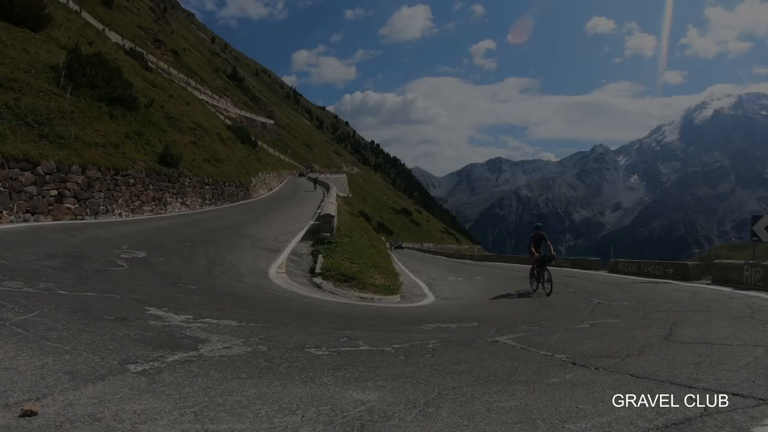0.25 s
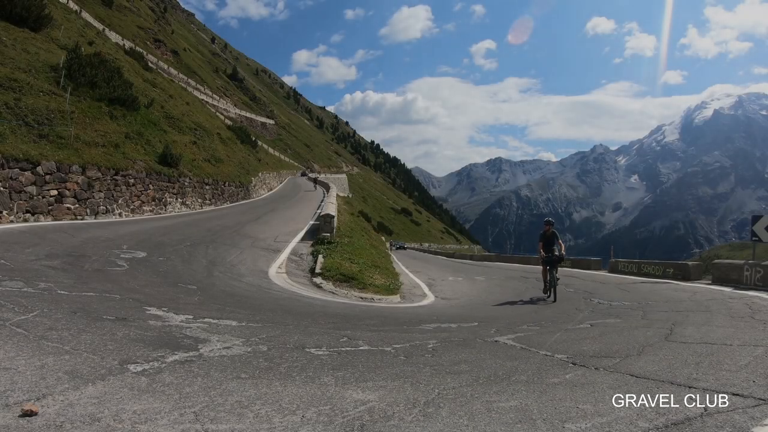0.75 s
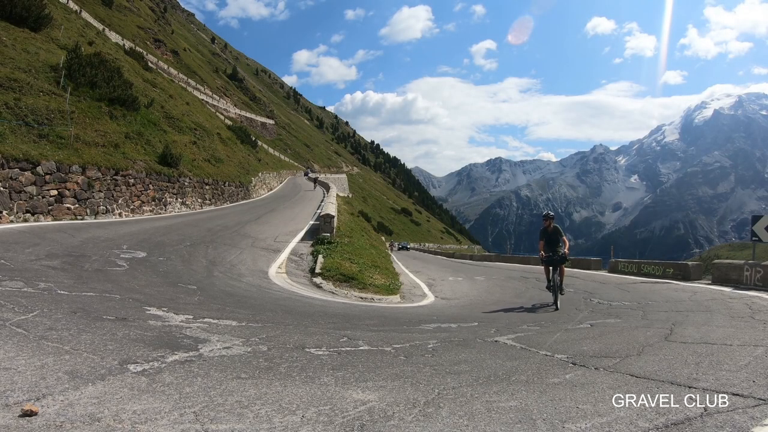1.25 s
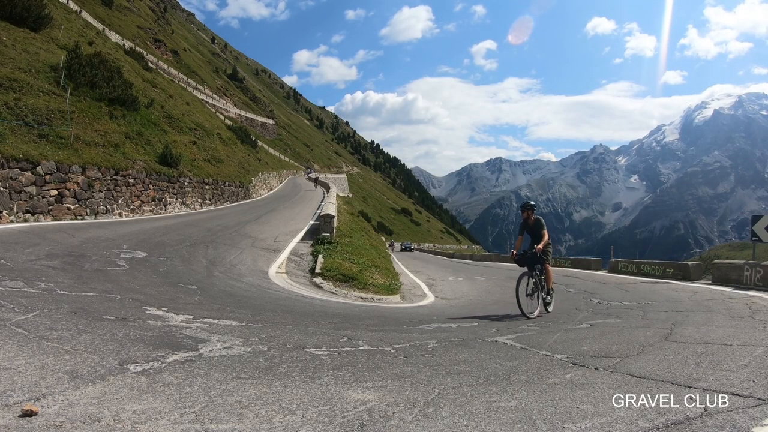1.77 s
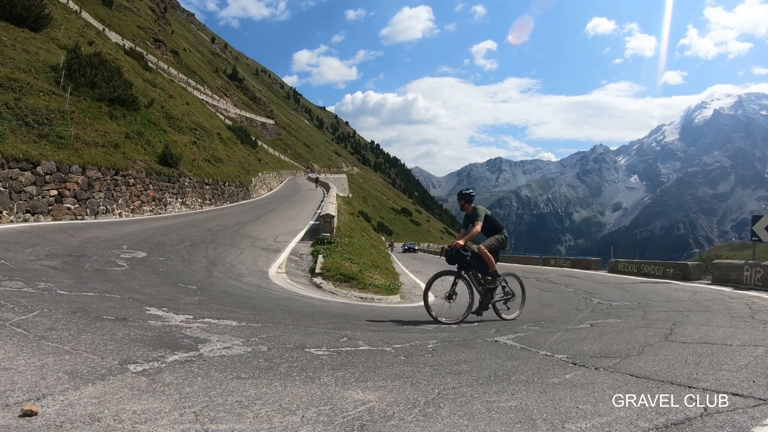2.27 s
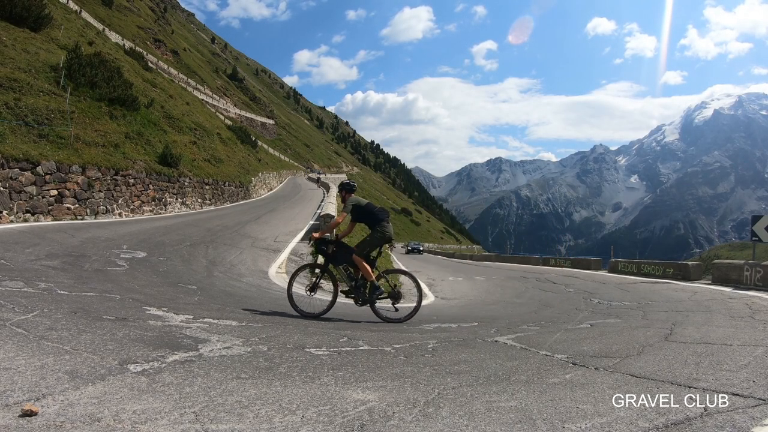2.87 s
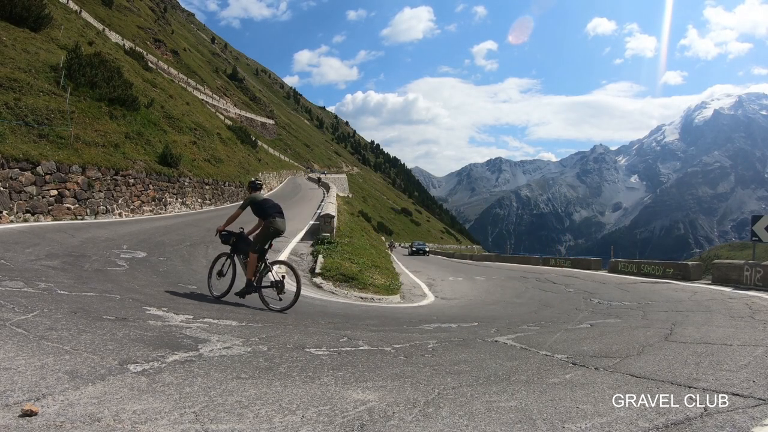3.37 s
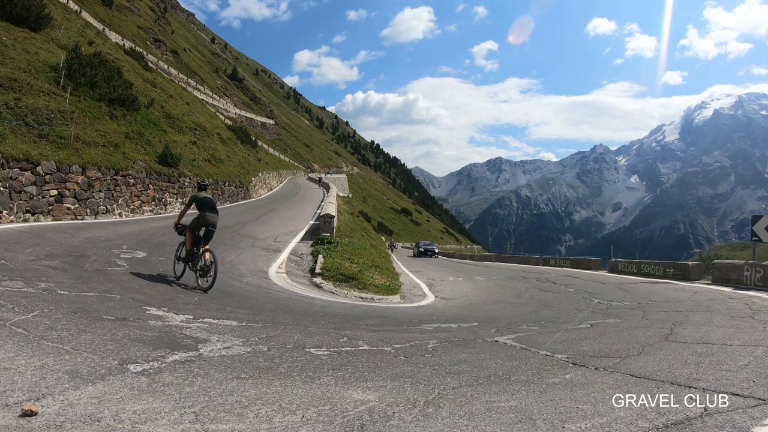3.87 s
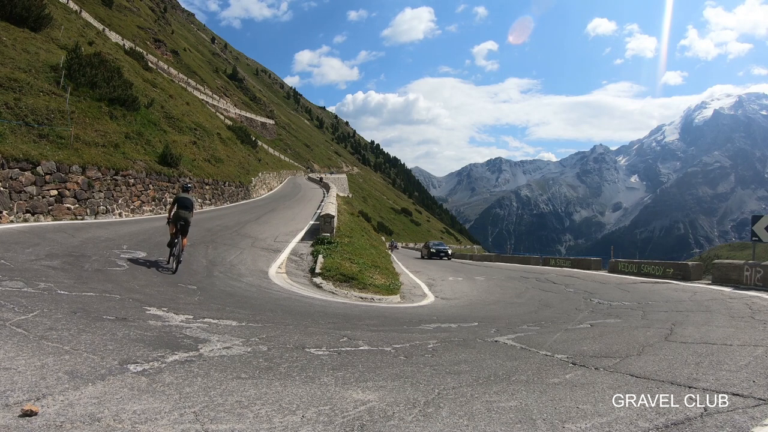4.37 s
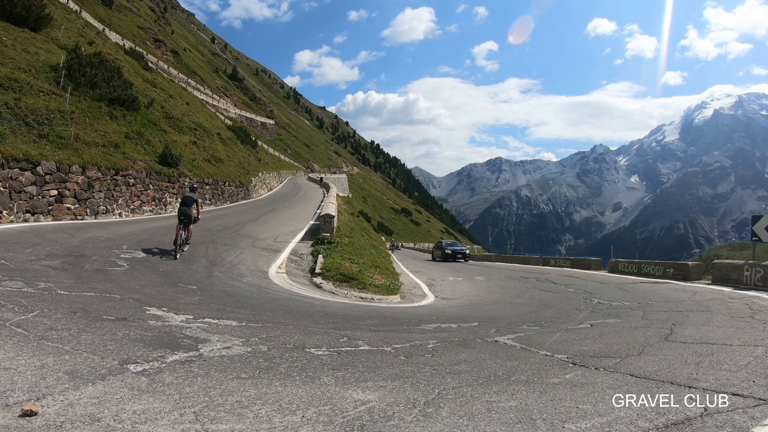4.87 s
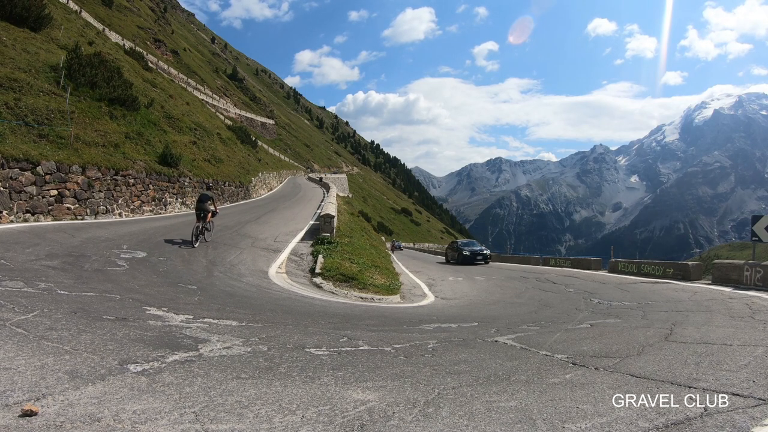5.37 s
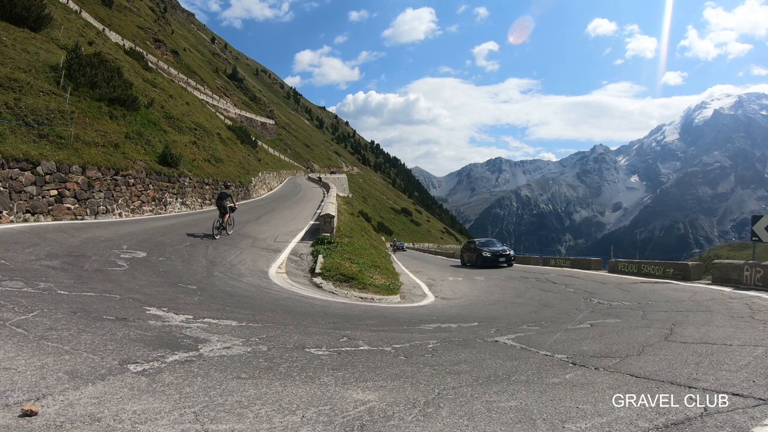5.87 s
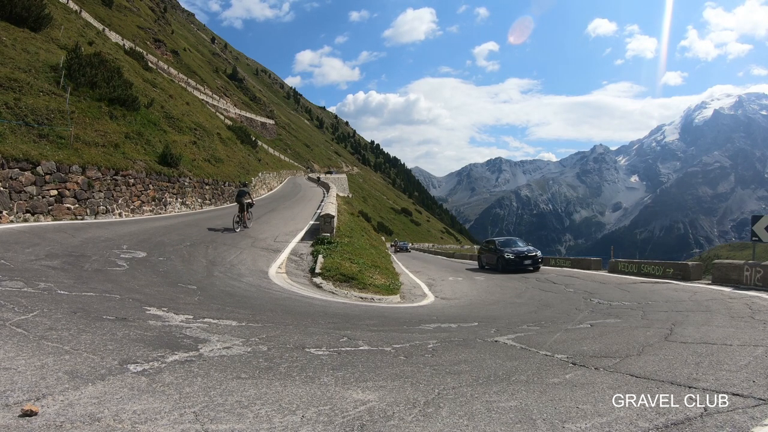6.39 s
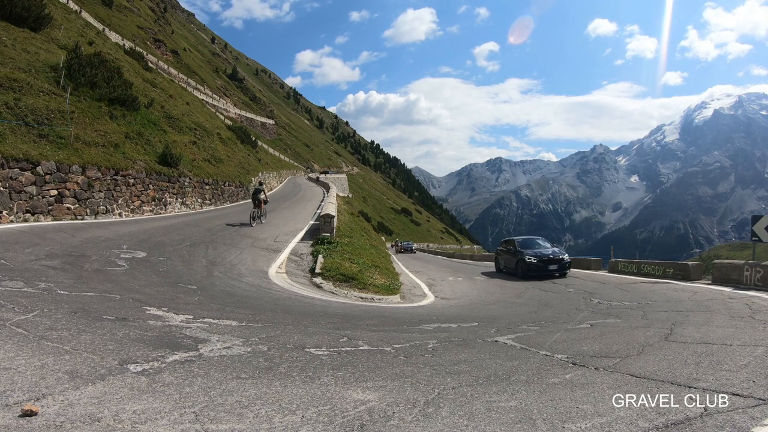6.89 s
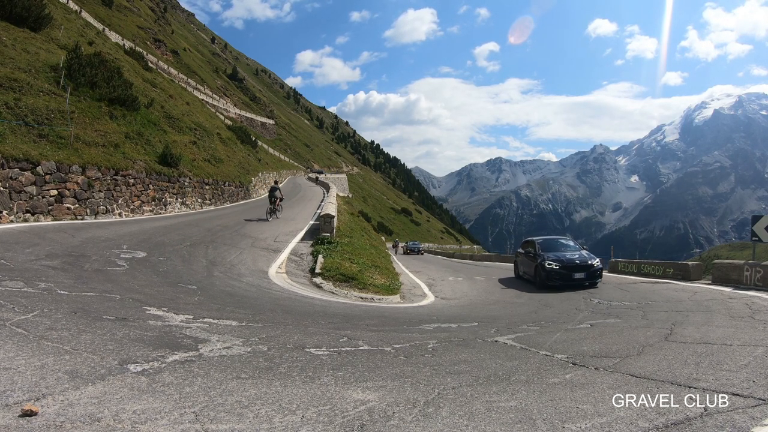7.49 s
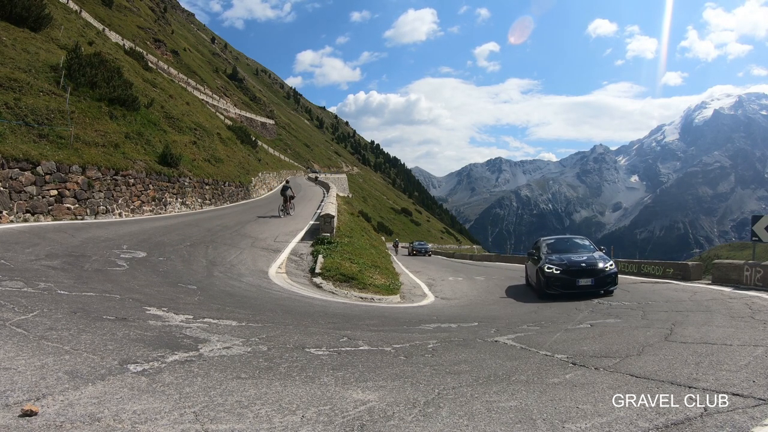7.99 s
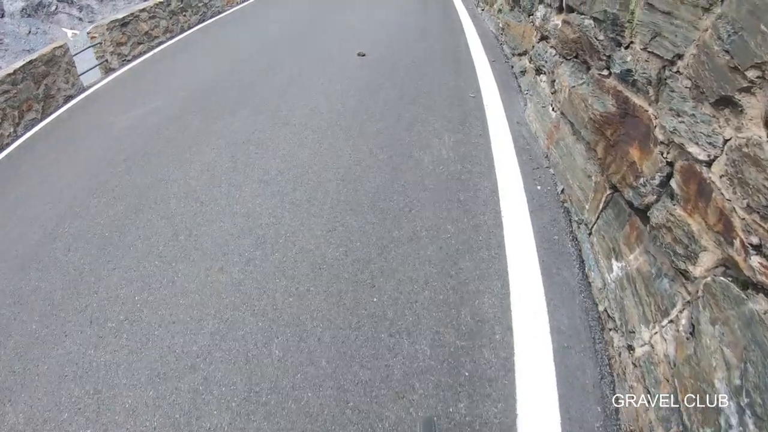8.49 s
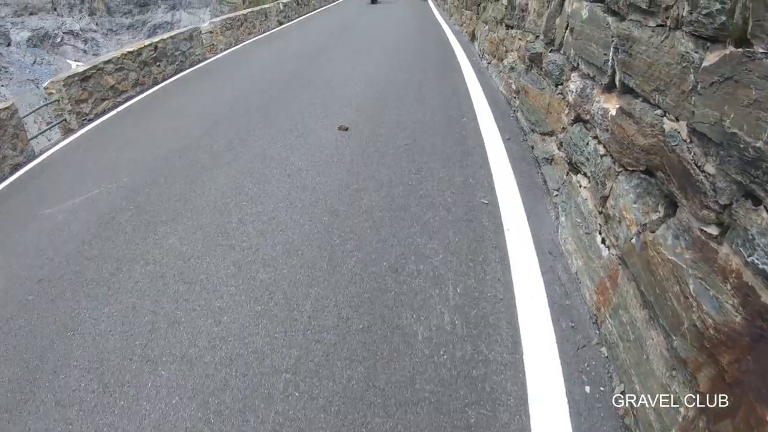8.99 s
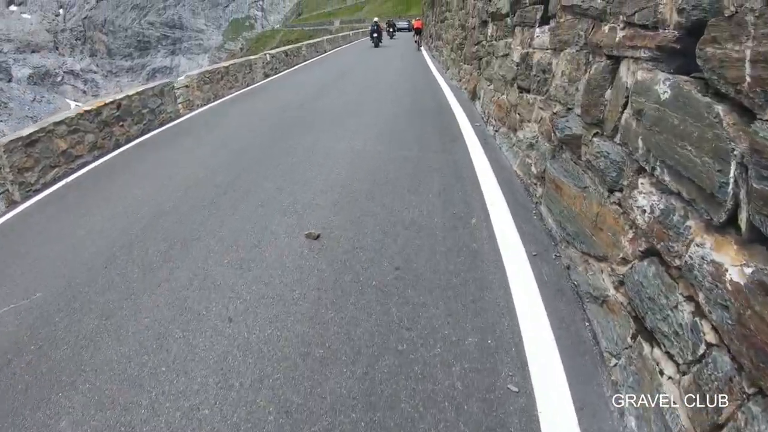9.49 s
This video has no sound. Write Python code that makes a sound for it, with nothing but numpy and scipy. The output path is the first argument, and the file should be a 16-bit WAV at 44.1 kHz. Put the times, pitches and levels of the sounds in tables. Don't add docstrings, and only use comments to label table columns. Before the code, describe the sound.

Low engines drone and drift along a mountain road over tyre roar, cut dead, then motorcycles roar close along a stone wall.

```python
import sys
import numpy as np
from scipy import signal
from scipy.fft import rfft, irfft, next_fast_len
from scipy.io import wavfile
from scipy.ndimage import uniform_filter1d

SR = 44100
rng = np.random.default_rng(int(sys.argv[2]) if len(sys.argv) > 2 else 0)


def generate_wav(sig):
    pcm = np.round(np.clip(np.atleast_2d(sig).T, -1, 1) * 32767).astype(np.int16)
    wavfile.write(sys.argv[1], SR, pcm)


def magnitude_from_level(level_db):
    exponent = np.asarray(level_db, float) / 20
    return 10 ** exponent


N = 429534


def rms_one(x):
    return x / np.sqrt(np.mean(x ** 2) + 1e-20)


def over_time(s, values):
    return np.interp(np.arange(N) / SR, s, values)


def in_time(rows):
    s, *columns = np.transpose(rows)
    return [over_time(s, column) for column in columns]


def drift(rate_hz):
    r = np.exp(-80 * np.pi * rate_hz / SR)
    slow = signal.lfilter([1], [1, -2 * r, r * r], rng.standard_normal(N // 40 + 2002))[2000:]
    return np.interp(np.arange(N) / 40, np.arange(len(slow)), rms_one(slow))


def resonate(x, hz, width_hz):
    r = np.exp(-np.pi * width_hz / SR)
    top_gain_one = np.array([1, 0, -1]) * (1 - r * r) / 2
    return signal.lfilter(top_gain_one, [1, -2 * r * np.cos(2 * np.pi * hz / SR), r * r], x)


def band_noise(order, band_hz):
    band = signal.butter(order, band_hz, "band", fs=SR, output="sos")
    return rms_one(signal.sosfilt(band, rng.standard_normal(N)))


def coloured(spectrum, patchy_db, gust_db):
    size = next_fast_len(N)
    octave = np.log2(np.arange(size // 2 + 1) * SR / size + 1)
    hz, level_db = np.transpose(spectrum)
    shape = magnitude_from_level(np.interp(octave, np.log2(hz), level_db, -120, -120))
    whole = rfft(rng.standard_normal(size)) * shape
    out, together_db = 0, gust_db * drift(5.3)
    for centre in range(int(np.log2(hz[0])), int(np.log2(hz[-1])) + 2):
        band = irfft(whole * np.clip(1 - abs(octave - centre), 0, 1), size)[:N]
        out = out + band * magnitude_from_level(patchy_db * drift(16) + together_db)
    return rms_one(out)


def above(level_db, far_db):
    return np.sqrt(np.clip(magnitude_from_level(level_db) ** 2 - magnitude_from_level(far_db) ** 2, 0, None))


def engine(rows, wobble, flutter_db, orders=((1, 0, 1),), fade_s=99):
    hz, load_db = in_time(rows)
    turn = 2 * np.pi * np.cumsum(hz * (1 + wobble * drift(3.86))) / SR
    out = 0
    for multiple, db, load_share in orders:
        level = magnitude_from_level(db + load_share * load_db + flutter_db * drift(2))
        out = out + level * np.sin(multiple * turn + rng.uniform(0, 2 * np.pi))
    first, last = rows[0][0], rows[-1][0]
    return np.sqrt(2) * out * over_time([first - fade_s, first, last, last + fade_s], [0, 1, 1, 0])


def far_rumble(lull_db):
    # (frequency [Hz], density [dB per Hz])
    rumble_band = [(12, -45), (20, -9), (60, -1.5), (91, 1), (136, -3.5), (184, -19), (258, -16),
                   (400, -31.5), (520, -48), (880, -120)]
    fading_db = -30.5 - 0.07 * np.arange(N) / SR
    return magnitude_from_level(fading_db + lull_db) * coloured(rumble_band, patchy_db=1, gust_db=.5)


def valley_roar(near_db):
    # (frequency [Hz], density [dB per Hz])
    valley_band = [(170, -3.5), (250, -2.5), (330, -10), (430, -11.5), (700, -20.5), (1200, -19.5),
                   (1800, -25), (3000, -30), (4500, -41), (5800, -52), (7500, -73), (10000, -74),
                   (12000, -87.5), (15000, -85)]
    roar_db = -38 + 0.58 * near_db + over_time((4.74, 6.1), [0, 3.5])
    wash_db = -50 + over_time([0, 0.67], [-2, 0])
    roar = coloured(valley_band[:5] + [(1400, -41.0)], patchy_db=0.27, gust_db=0.47)
    wash = coloured([(400, -28.5)] + valley_band[4:], patchy_db=0.04, gust_db=0.5)
    return magnitude_from_level(roar_db) * roar + magnitude_from_level(wash_db) * wash


def exhaust_drone():
    # (time [s], level [dB])
    drone_level = [(0, -59), (.3, -51.5), (.7, -50), (1.1, -53.5), (1.28, -56), (1.38, -51), (1.5, -59),
                   (2.2, -66), (2.6, -90)]
    # (frequency [Hz], density [dB per Hz])
    drone_band = [(420, -20.5), (480, 0.5), (600, -1.5), (680, -6.5), (730, -25)]
    return magnitude_from_level(in_time(drone_level)[0]) * coloured(drone_band, patchy_db=1.5, gust_db=1.0)


def tyres_rolling(near_db):
    # (frequency [Hz], density [dB per Hz])
    tyre_band = [(620, 0), (850, -4.5), (1300, 1.5), (1700, -2), (1950, -15), (2900, -11), (3500, -15),
                 (4000, -24.5), (4900, -24), (5800, -32.5), (7000, -36.5), (9000, -42.5), (11000, -49),
                 (14000, -66)]
    # (time [s], hiss level [dB])
    hiss_level = [(0, -55), (.3, -53), (.55, -52.5), (.8, -50), (1.1, -51.5), (1.42, -51.5), (1.6, -55.5),
                  (2.4, -56.5), (3.2, -58.5)]
    # (frequency [Hz], width [Hz], level over the hiss [dB])
    whistle_rows = [
        (2757, 110, -9),
        (3466, 79, -12.5),
        (4700, 60, -22),
        (5200, 60, -26),
    ]
    tread = coloured([(500, -22.5)] + tyre_band[1:5] + [(2600, -30.0)], patchy_db=1.0, gust_db=1.1)
    hiss = coloured([(1500, -28.0)] + tyre_band[4:], patchy_db=2.0, gust_db=1.0)
    white = rng.standard_normal(N)
    for hz, width_hz, db in whistle_rows:
        hiss += magnitude_from_level(db) * rms_one(resonate(resonate(white, hz, width_hz), hz, width_hz))
    return above(-46 + near_db, -53.5) * tread + above(in_time(hiss_level)[0], -58) * hiss


def distant_engines(lull_db):
    # (time [s], firing rate [Hz], load [dB])
    slowing, passing, arriving = [(0, 45.51, -43.5), (.45, 45.5, -42), (.75, 44.5, -27.5),
                                  (1.5, 43.5, -27.5), (1.72, 43, -33.5), (1.95, 42.5, -29),
                                  (2.1, 42.5, -34.5), (2.52, 41.5, -38), (2.7, 41.5, -23.5),
                                  (2.87, 41, -38), (3.15, 40.5, -29.5), (4.3, 40.5, -27), (4.9, 40, -35.5),
                                  (5.5, 40, -29), (6.2, 39.5, -40), (6.75, 38.5, -32), (7.02, 39, -46),
                                  (7.25, 39, -35), (8.24, 38, -37.5)], [(.7, 111.3, -4.5), (1.1, 113.5, -1.5),
                                                   (1.5, 116.2, -0.5), (1.9, 116.8, -1), (2.3, 116.4, -1.5),
                                                   (2.6, 114.9, -3.5), (3.6, 112.7, -3), (4.3, 107, -6)], [(4.95, 67.27, -5.5), (5.6, 70, -2),
                                                                    (6, 71.4, -1), (6.3, 70.96, -3.5),
                                                                    (6.6, 70.07, -2.5), (7.1, 68.1, -5),
                                                                    (8.1, 64, -2)]
    # (multiple of the firing rate, level [dB], share of the load swing)
    slowing_orders = [(1, -28.5, 0.26), (2, 0.0, 1.0)]
    passing_orders = [(1, -32, 1.0), (2, -36, 2.8), (3, -47.5, 1.2)]
    arriving_orders = [(1, -36.5, 1.2), (2, -43, 0.49)]
    # (time [s], firing rate [Hz], level [dB])
    descending, climbing, steady = [(.6, 110, -28.5), (1.0, 108.2, -32), (1.9, 106.2, -34.5),
                                    (2.25, 106.4, -31), (2.42, 105.6, -26.5), (2.85, 104.9, -27),
                                    (3.3, 102.6, -27), (3.8, 100.1, -32.5), (4.4, 98, -32.5),
                                    (4.9, 96.5, -28), (5.25, 95.5, -35), (5.7, 93.5, -39.5),
                                    (6.0, 91.75, -30.5), (6.45, 88, -35), (6.62, 87.4, -51),
                                    (7.02, 86.9, -46), (7.3, 84.7, -30), (8.24, 83.8, -33)], [(3.8, 115.7, -37.5), (4.25, 116.5, -39.5),
                                                        (4.6, 119.6, -34), (5.0, 120, -37.5),
                                                        (5.4, 121.2, -39), (6.25, 125.3, -38.5)], [(.4, 132, -47), (1.2, 136, -41.5),
                                                                          (2.3, 138.3, -39),
                                                                          (3, 136.8, -46),
                                                                          (3.6, 136.5, -41.5),
                                                                          (4.3, 135.7, -43.5),
                                                                          (4.9, 135.3, -35.5),
                                                                          (5.6, 133.6, -38.5),
                                                                          (6.5, 131.2, -44.5),
                                                                          (7.0, 129.4, -39),
                                                                          (7.3, 128.3, -36),
                                                                          (7.7, 128, -36.5),
                                                                          (8.2, 127.1, -38)]
    # (time [s], frequency [Hz], level [dB])
    overtones = [
        [(0, 581, -54), (.5, 601, -56)],
        [(.6, 254.5, -43), (1.05, 251.8, -43)],
        [(0, 159.6, -47), (.3, 164.5, -46.5), (1.1, 171.6, -46)],
        [(0, 211, -53.5), (.55, 221.4, -47.5)],
        [(3.3, 165, -48), (3.7, 164.5, -46.5), (4.2, 162.5, -42.5), (4.6, 160.6, -44)],
        [(3.0, 260.7, -48), (3.3, 259.4, -48.5)],
        [(3.7, 252.5, -44), (4.0, 254, -46.5)],
        [(6.9, 245, -47), (7.5, 239.8, -47), (8.1, 231.3, -43.5)],
        [(6.55, 156, -40.5), (6.75, 156.9, -42), (7.35, 154.3, -40.5), (8.3, 153.1, -41)],
    ]
    eased = engine(passing, .003, 1.6, passing_orders, fade_s=0.23)
    eased += engine(arriving, 0.0041, 2.5, arriving_orders, fade_s=0.82)
    eased += engine(climbing, 0.004, 2.0, fade_s=0.24)
    eased += engine(steady, 0.003, 1.5)
    out = magnitude_from_level(2.2 * lull_db) * eased
    out += engine(slowing, 0.002, 0.6, slowing_orders)
    out += engine(descending, 0.002, 0.6, fade_s=.06)
    return out + sum(engine(rows, 0.0063, 2.5, fade_s=0.13) for rows in overtones)


def grasshopper():
    first_s, period_s, length_s = 2.715, .17663, .045
    t = np.arange(N) / SR - first_s + period_s / 2
    swell = np.exp(-((t % period_s - period_s / 2) / length_s * 2) ** 2)
    pulse = swell * np.clip(t / 2, 0, 1) * magnitude_from_level(3.5 * drift(4)) + 1.0
    return magnitude_from_level(-86.5 + 1.4 * drift(12)) * pulse * band_noise(5, (5200, 9600))


def ticks():
    # (time [s], peak [dB], ring [Hz], width [Hz], rattle length [s])
    tick_rows = [(0.061, -56, 7000, 5000, 0.012), (0.1558, -39.5, 2100, 600, 0.002),
                 (0.215, -40, 1980, 350, .002), (0.216, -42, 1400, 500, .001),
                 (.669, -30.5, 4150, 3400, .005), (0.6699, -43, 8600, 6000, .008),
                 (.672, -33.5, 2900, 1500, .006), (.671, -32, 1500, 1300, .006),
                 (.677, -32.5, 1250, 800, .008), (.679, -36, 2300, 1400, .008),
                 (.848, -58, 7000, 4960, .003), (2.3924, -48, 2900, 900, .0005),
                 (2.3935, -49, 4600, 1300, .001), (2.3955, -56, 5300, 900, .001),
                 (2.394, -60, 7000, 1800, .001), (2.393, -70, 10600, 700, .0002),
                 (4.2345, -36, 1488, 550, 0.0004), (5.045, -68, 9900, 2000, .002),
                 (5.2585, -61, 7000, 2500, .004), (5.2635, -56, 5200, 1498, .002),
                 (5.279, -65, 6800, 900, .002), (6.2335, -65, 10300, 1997, .002),
                 (6.9381, -21.5, 830, 680, .0002), (6.9382, -40, 3050, 700, .0002),
                 (6.942, -38.5, 900, 900, .0005), (6.9482, -34, 896, 900, .0002),
                 (6.953, -36, 900, 900, .001), (0.663, -42, 750, 60, .004), (8.48, -35, 3000, 2500, .012),
                 (8.522, -27, 900, 300, .002), (8.547, -32, 900, 300, .002), (8.82, -28.5, 890, 450, .006)]
    out, t = np.zeros(N), np.arange(SR // 10) / SR
    for s, peak_db, hz, width_hz, length_s in tick_rows:
        sparse = rng.standard_normal(len(t)) * (rng.random(len(t)) < .05)
        ring = .5 * sparse * np.exp(-t / max(length_s, 1e-4))
        ring[0] = -1
        for _ in range(3):
            ring = resonate(ring, hz, width_hz)
        out[round(s * SR):][:len(t)] += magnitude_from_level(peak_db) * ring / abs(ring).max()
    return out


def high_puffs():
    # (time [s], peak [dB])
    puff_rows = [(0.8113, -84.5), (0.8672, -90), (0.948, -92), (1.1261, -84.5), (1.1874, -80),
                 (1.4409, -80.5), (1.756, -80.5), (2.2166, -85.5), (2.3907, -92), (2.8217, -90),
                 (2.937, -81), (3.1103, -81.5), (3.21, -78.5), (3.4967, -84), (3.6573, -80),
                 (3.7636, -82.5), (3.796, -82), (3.8647, -79.5), (3.92, -81), (4.1422, -79.5),
                 (4.3604, -78), (4.7074, -77.5), (4.9589, -77), (5.359, -85.5), (5.8878, -86),
                 (5.9396, -86.5), (6.0357, -78.5), (6.1342, -83), (6.2993, -80.5), (6.8087, -86),
                 (7.8997, -78)]
    t, level, puff_s = np.arange(N) / SR, magnitude_from_level(-108), .003
    for s, peak_db in puff_rows:
        level = level + magnitude_from_level(peak_db - 6) * np.exp(-((t - s - puff_s) / puff_s) ** 2)
    return level * band_noise(4, (9500, 15400))


def thinned(x):
    # (low edge [Hz], high edge [Hz], kept above this over the usual level [dB])
    top_bands = [(8800, 9300, -3.5), (9300, 9800, -2.5), (9800, 10400, 0), (10400, 11200, 2.5),
                 (11200, 12200, 16), (12200, 14000, 15)]
    hz, out = np.arange(N // 2 + 1) * SR / N, x.copy()
    for low_hz, high_hz, keep_db in top_bands:
        band = irfft(rfft(x) * ((hz > low_hz) & (hz <= high_hz)), N)
        level_db = 10 * np.log10(uniform_filter1d(band ** 2, size=4096) + 1e-20)
        over_db = level_db - np.median(level_db) + 2 * drift(5.0)
        kept = (over_db > keep_db)[::1024]
        out -= band * uniform_filter1d(1. - np.repeat(kept, 1024)[:N], size=512)
    return out


def hairpin():
    # (centre [s], length [s], depth [dB])
    lulls = [
        (0.019, 0.27, 11.5),
        (0.425, 0.26, 13.5),
        (6.254, 0.85, 1),
        (6.995, 0.15, 7.5),
    ]
    # (time [s], level [dB])
    nearness = [(0, -8), (.25, -3.5), (.75, -0.5), (2, 0), (3.5, -4), (5, -5.5), (6.5, -8), (8.2, -5.5)]
    t = np.arange(N) / SR
    lull_db = -sum(depth_db * np.exp(-(2 * (t - s) / length_s) ** 4) for s, length_s, depth_db in lulls)
    near_db = in_time(nearness)[0]
    road = far_rumble(lull_db) + valley_roar(near_db) + exhaust_drone() + tyres_rolling(near_db)
    heard = thinned(road + distant_engines(lull_db) + grasshopper()) + high_puffs()
    return signal.sosfilt(signal.butter(2, 27, "high", fs=SR, output="sos"), heard)


def exhaust_along_wall(turn):
    # (time [s], exhaust level [dB], mechanical roar level [dB])
    wall_level = [(8.42, -37, -44.5), (8.49, -34, -44), (8.62, -35, -45.5), (8.904, -38.5, -47),
                  (9.346, -37.5, -47), (9.62, -42.5, -49.5), (9.7, -41.5, -47)]
    # (frequency [Hz], density [dB per Hz])
    low_band, high_band = [(12, -46), (20, -16.5), (70, -8.5), (134, -9.5), (256, -25), (321, -34),
                           (448, -24.5), (515, -24), (705, -28.5), (917, -30.5), (1300, -57.5), (1690, -77),
                           (2860, -120)], [(1100, -1.5), (1700, -2), (2400, -5.5), (3500, -7.5),
                                             (4600, -11.5), (5500, -19), (7000, -24.5), (9000, -32),
                                             (11000, -36), (13000, -46.5), (15500, -59.5)]
    # (multiple of the crank rate, width [Hz], early level [dB], late level [dB])
    pipe_bands = [(34.85, 56, -1, 0), (53.4, 90, -8, -5), (79.2, 130, -11.5, -5), (19.9, 18, -11.5, -1),
                  (112.6, 120, -18.5, -16), (149.4, 130, -17, -21.5), (64, 110, -12.5, -18),
                  (162, 120, -25, -19.5), (10.2, 40, -1.5, 4.5), (31.4, 45, -12, -5.5),
                  (37.6, 61, -7.5, -8.5)]
    exhaust_db, roar_db = in_time(wall_level)
    puff = 1 + 0.089 * np.cos(turn) + 0.028 * np.cos(turn / 2)
    out = magnitude_from_level(exhaust_db + 7.0) * coloured(low_band, patchy_db=0.5, gust_db=1.0)
    out += magnitude_from_level(roar_db + 0.7) * puff * coloured([(600, -24.5)] + high_band, patchy_db=0.0, gust_db=1.0)
    late = over_time([8.9, 9.2], [0, 1])
    rough = 0
    for multiple, width_hz, early_db, late_db in pipe_bands:
        band = drift(width_hz) * np.sin(multiple * turn) + drift(width_hz) * np.cos(multiple * turn)
        rough = rough + magnitude_from_level(early_db + (late_db - early_db) * late) * band
    beat = 1 + 0.2 * np.cos(1.4 * turn)
    return out + magnitude_from_level(exhaust_db - 7.5) * beat * rough * over_time((8.3, 8.5), [0, 1])


def near_motorcycle():
    # (time [s], crank rate [Hz], level of the fifth order [dB])
    bike_speed = [(8.47, 25.19, -16.5), (8.766, 25.54, -17.5), (9.042, 26.04, -19), (9.138, 26.18, -18.5),
                  (9.276, 26.71, -18.5), (9.65, 26.97, -19.5), (9.74, 26.86, -19.5)]
    # (multiple of the crank rate, level [dB])
    bike_orders = [(0.5, -41.5), (1, -33.5), (1.5, -31), (2, -11), (2.5, -17.5), (3, -18.5), (3.5, -18.5),
                   (4, -26), (4.5, -16), (5, 1.5), (5.5, -28.5), (6, -5), (6.5, -30.5), (7, -8), (7.5, -29),
                   (8, -17), (8.5, -28.5), (9, -22.5), (9.5, -33.5), (10, -18), (10.5, -34.5), (11, -18.5),
                   (11.5, -31.5), (12, -26.5), (12.5, -27), (13, -25), (13.5, -40.5), (14, -29.5),
                   (14.5, -45.5), (15, -31)]
    # (time [s], level [dB])
    throttle = [(8.4, -1), (8.5, 4), (8.65, 0.5), (8.8, 0), (9.0, 1), (9.3, -2.5), (9.7, -2)]
    hz, level_db = in_time(bike_speed)
    turn = 2 * np.pi * np.cumsum(hz * (1 + 0.00203 * drift(5))) / SR
    fifth_db, throttle_db = dict(bike_orders)[5], in_time(throttle)[0]
    tones = 0
    for k, db in bike_orders:
        order_db = db - fifth_db + (0.04 + 0.23 * k) * drift(4.9) + (k >= 8) * throttle_db
        tones = tones + magnitude_from_level(order_db) * np.sin(k * turn + rng.uniform(0, 2 * np.pi))
    return np.sqrt(2) * magnitude_from_level(level_db) * tones + exhaust_along_wall(turn)


def machines_ahead():
    # (time [s], firing rate [Hz], load or level [dB])
    second, third = [(8.42, 105, 1), (8.53, 105.4, 1.5), (8.75, 105.2, -1), (9.1, 105.3, -2),
                     (9.3, 105, -1.5), (9.5, 104.8, -1), (9.7, 103, -7)], [(8.5, 114.1, -31), (8.7, 113.2, -24), (8.9, 113.4, -20.5),
                                     (9.2, 113.9, -24.5), (9.45, 113.7, -25.5), (9.7, 113.9, -23)]
    # (multiple of the firing rate, level [dB], share of the load swing)
    second_orders = [(1, -32.5, 2.1), (2, -28, 0.76), (3, -37, 1.6), (5, -49, 0.077)]
    # (time [s], frequency [Hz], level [dB])
    ringing = [
        [(8.48, 900, -47.5), (8.58, 890, -50)],
        [(8.57, 864, -47.5), (8.66, 863.5, -44.5), (8.82, 872, -47.5)],
        [(8.85, 910.5, -48.5), (9.0, 912.3, -51), (9.15, 924, -45.5), (9.3, 916.4, -51.5), (9.4, 915, -48)],
        [(9.3, 950, -55), (9.5, 962, -53.5), (9.6, 947, -52.5)],
    ]
    # (time [s], frequency [Hz], level [dB])
    whine = [(8.5, 571, -50.5), (8.75, 587, -57.5), (9.1, 593, -49), (9.3, 597.3, -46), (9.6, 602, -43.5),
             (9.74, 595, -54)]
    out = engine(second, .003, 1.2, second_orders) + engine(third, .003, 1.2)
    out += sum(engine(rows, .007, 3.0, fade_s=.04) for rows in ringing)
    return out + engine(whine, .01, 3.0)


def wall_road():
    return (near_motorcycle() + machines_ahead()) * over_time((8.385, 8.46), [0, 1]) ** 1.7


def cut_on_crest(x, cut, crest):
    lift = np.zeros(N)
    lift[cut - 200:cut] = (crest - x[cut - 1]) * np.hanning(400)[:200]
    return (x + lift) * (np.arange(N) < cut)


def scene():
    first = cut_on_crest(hairpin(), round(8.24225 * SR), .085)
    second = cut_on_crest(wall_road(), N, .06)
    return (first + second + ticks())[None]


def roll_off(x):
    return signal.sosfilt(signal.butter(12, 15500, fs=SR, output="sos"), x)


def record(dry):
    top = .8
    mix = top * np.tanh(dry / top)
    return roll_off(mix)


dry = scene()
out = record(dry)
generate_wav(out)
```